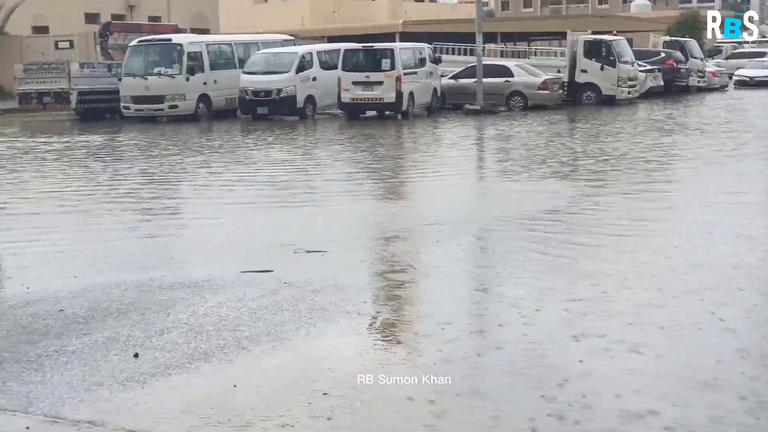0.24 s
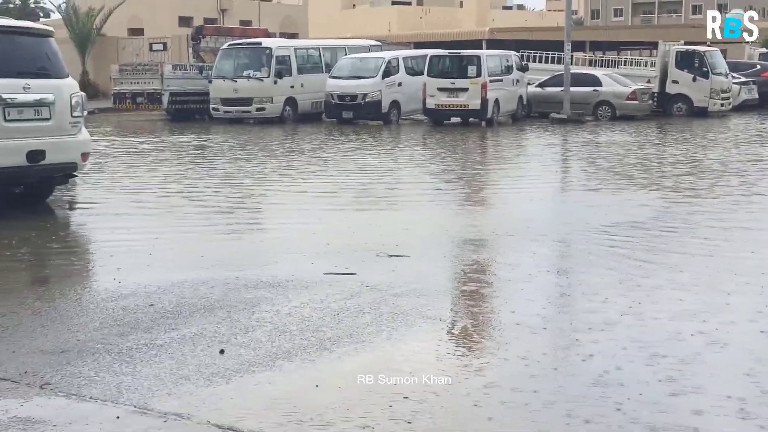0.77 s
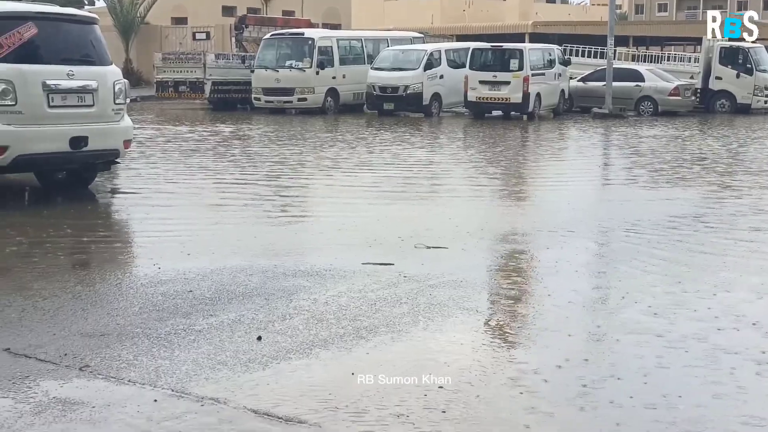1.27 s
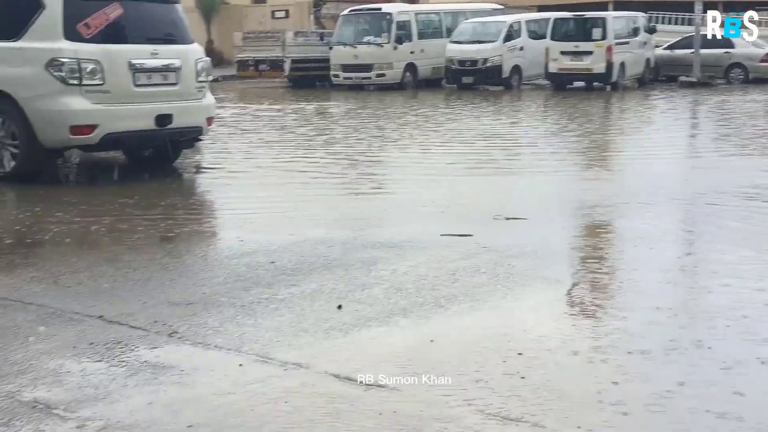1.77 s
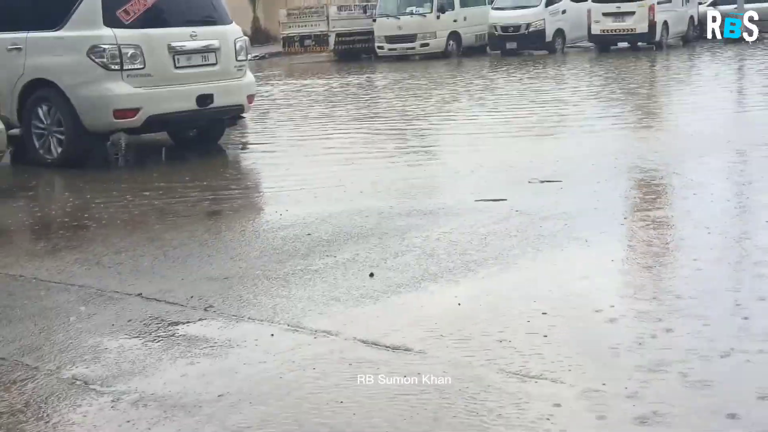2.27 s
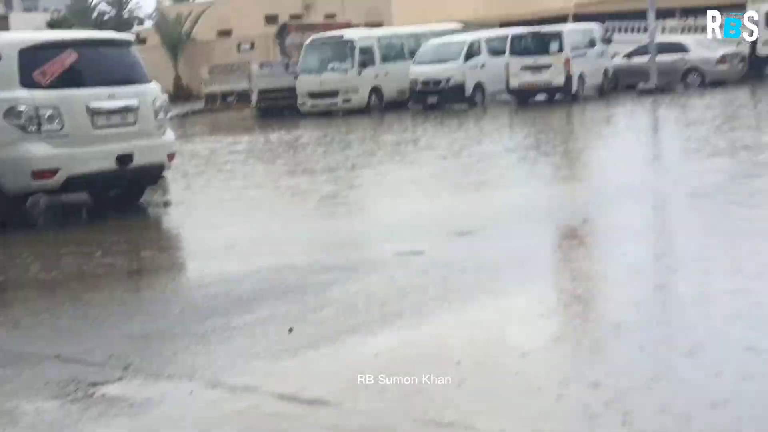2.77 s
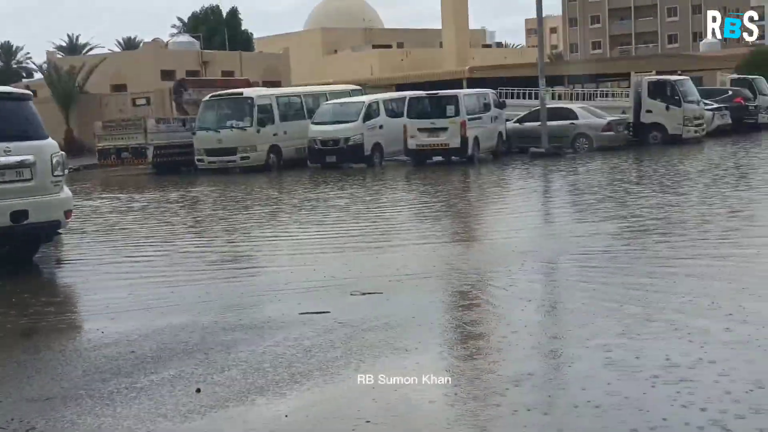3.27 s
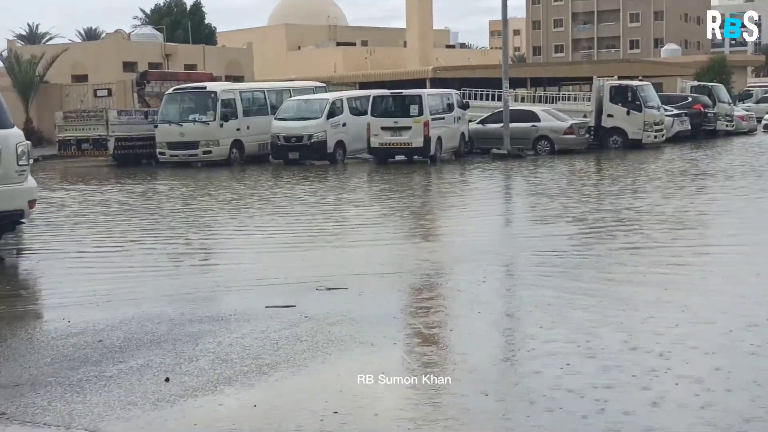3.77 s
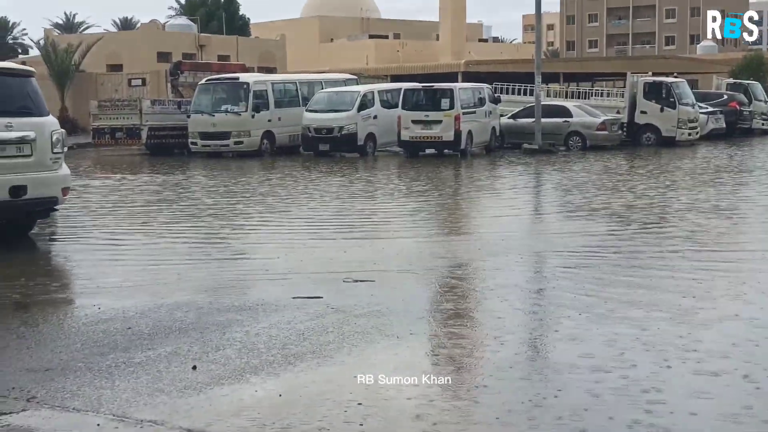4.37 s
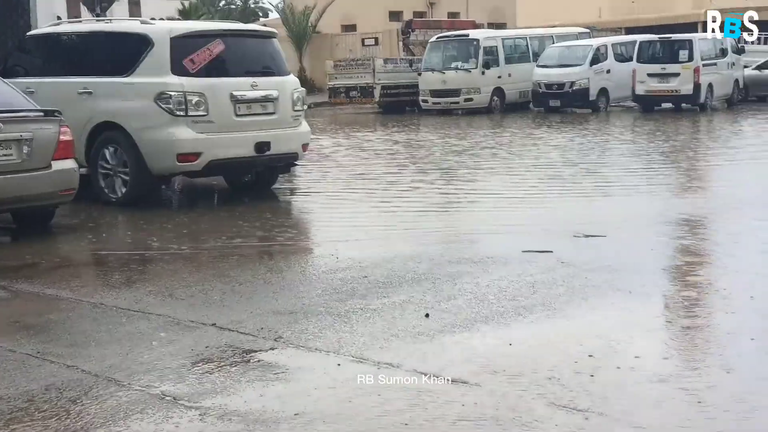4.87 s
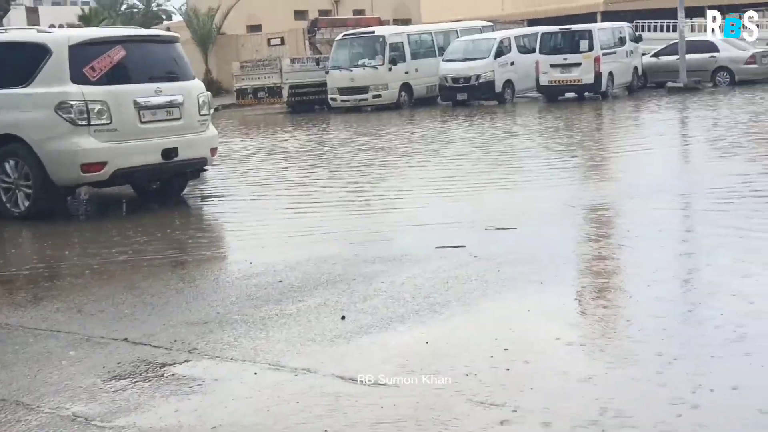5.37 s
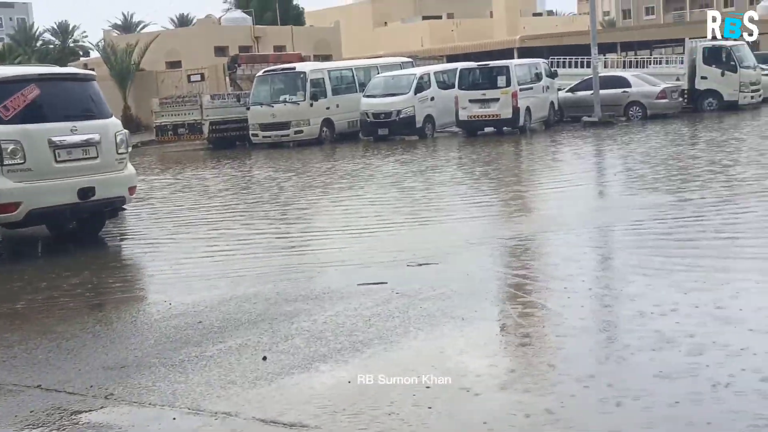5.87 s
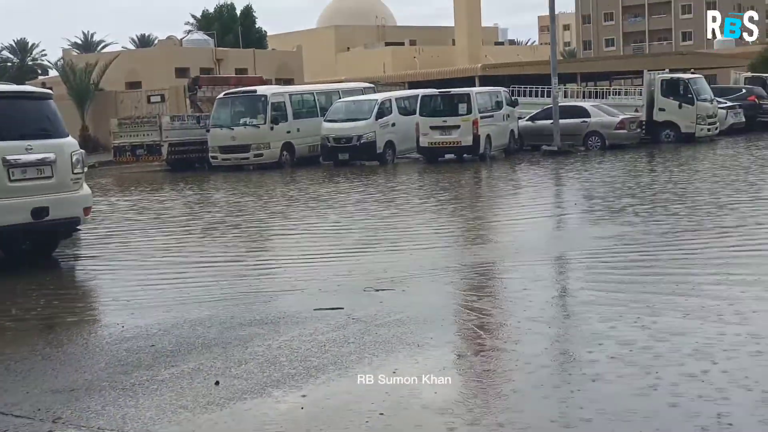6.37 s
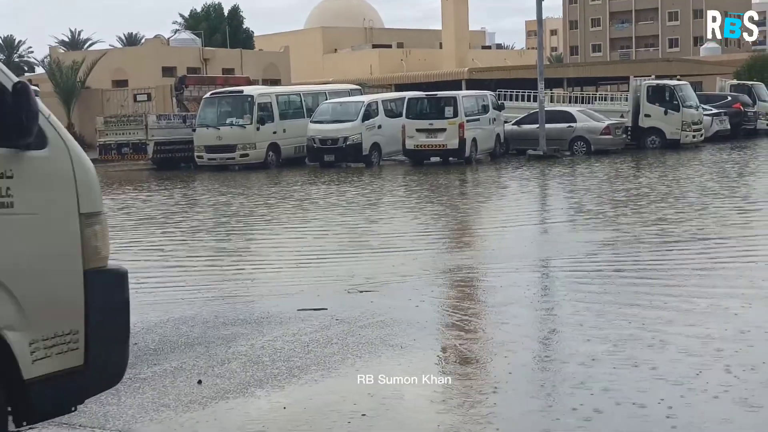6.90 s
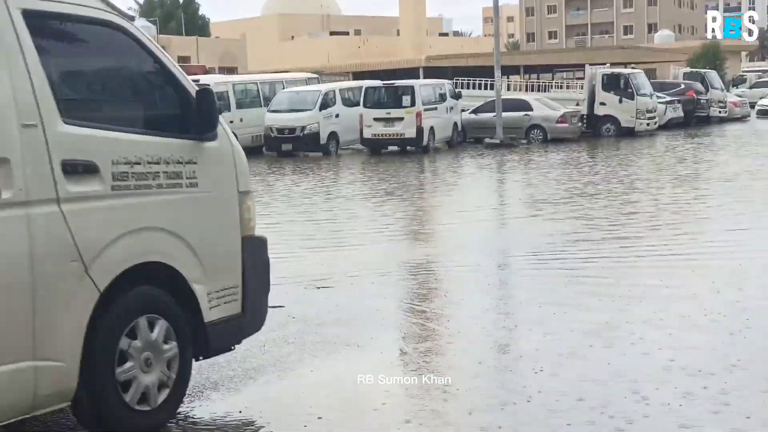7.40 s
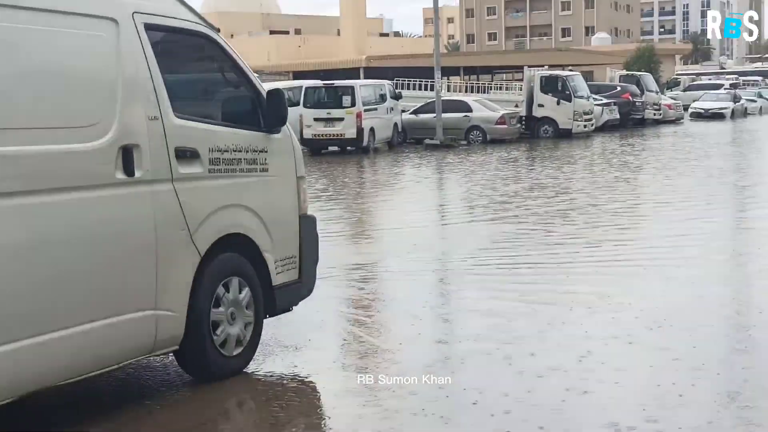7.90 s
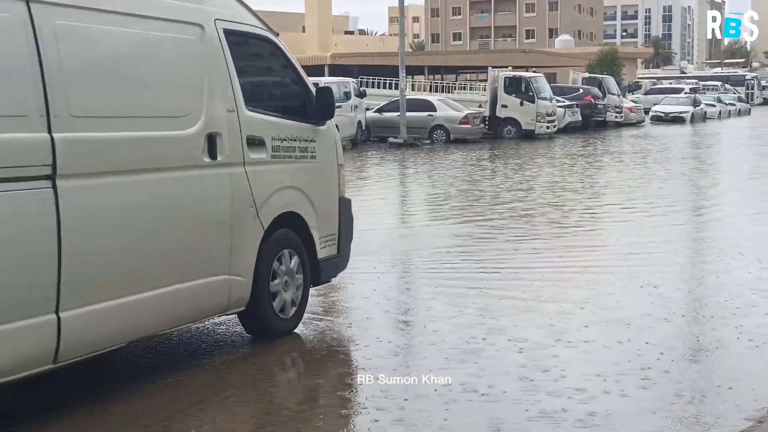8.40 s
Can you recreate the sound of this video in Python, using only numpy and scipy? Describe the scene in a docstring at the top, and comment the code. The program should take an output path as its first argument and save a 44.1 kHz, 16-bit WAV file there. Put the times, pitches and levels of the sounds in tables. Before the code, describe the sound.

A quiet outdoor background of drizzle, town hum and faint sparrows is broken by a close tap on the right of the microphone, followed by a distant caw. After a softer second tap, a van is abruptly heard driving through floodwater. Its tyres swish and churn loudly with separate splashes, the engine droning underneath, until the spray eases into a thinner hiss on the left as it comes alongside.

```python
"""Light rain hisses on a flooded street over town hum, with sparrows, a crow and two knocks on the right
microphone. Then the level jumps and a van rolls up from the side. Its tyres throw water, heard as
broadband slosh, ringing air bubbles and single splashes; its engine drones through a few body
resonances. As it draws level, the water thins to a hiss on the left."""
import sys
import numpy as np
from scipy import signal
from scipy.io import wavfile
from scipy.ndimage import uniform_filter1d

SR = 44100
rng = np.random.default_rng(int(sys.argv[2]) if len(sys.argv) > 2 else 0)


def to_wav(s):
    """Save 16-bit WAV."""
    ch = np.atleast_2d(s).T  # columns
    pcm = np.round(np.clip(ch, -1, 1) * 32767)  # PCM
    wavfile.write(sys.argv[1], SR, pcm.astype(np.int16))


N = 381454
SHORT, LONG = 256, 2048  # frame lengths in samples, for flicker and for bass
LAG_S = 0.0004286  # extra travel time to the left microphone


# Spectrum of thrown water. Each row: frequency in Hz, relative level in dB far and alongside,
# left minus right in dB far and alongside.
WATER_SPECTRUM = [(640, -33, -42, -6, 2), (1060, -3.5, -17, 5, 14), (1500, -2.5, -4.5, 3, 11),
                  (2290, 5, -24.5, 7.5, -1), (3730, -2, 11, 2, 16.5), (4720, -9.5, -18, 1, 2.5),
                  (6300, -10.5, -14.5, -2, 4), (8220, -13, -31, -4.5, -9.5), (8850, -14.5, -23, 9, 24),
                  (10050, -6, -13.5, 23, 38), (12700, -12.5, -23, 13, 24), (15500, -6.5, -27, 10, 29)]
# Slosh of the tyres. Each row: time in seconds, level in dB.
SLOSH = [(4.42, -46.5), (4.55, -47), (4.7, -45.5), (4.85, -44), (4.93, -43), (5, -40.5), (5.1, -41.5),
         (5.2, -42.5), (5.25, -36.5), (5.29, -42.5), (5.34, -38), (5.43, -37.5), (5.5, -39.5),
         (5.54, -42.5), (5.6, -31), (5.7, -37), (5.79, -36), (5.85, -33.5), (5.88, -38.5), (5.97, -33.5),
         (6.05, -37), (6.11, -38), (6.16, -42.5), (6.22, -34), (6.27, -38.5), (6.33, -35.5), (6.42, -33.5),
         (6.48, -37), (6.55, -35), (6.64, -33.5), (6.69, -46), (6.76, -40), (6.9, -35.5), (7.1, -43),
         (7.3, -38), (7.39, -42), (7.46, -38.5), (7.7, -39.5), (7.9, -45.5), (8.2, -43.5), (8.6, -48.5)]
# The van's approach. Each row: time in seconds, nearness from 0 (far) to 1 (alongside),
# fizz in dB relative to the slosh, gear whine in dB.
APPROACH = [(4.4, 0.057, -7, -43.5), (5.0, 0, -4, -50), (5.6, 0.03, -10.5, -46), (6.7, 0.21, -5.5, -51),
            (7.3, 0.34, -7.5, -57), (7.9, 0.73, -5.5, -73)]

def tyre_spray():
    """Churning water radiates broadband noise; nearness shifts its colour and side."""
    hz, t = grid(SHORT)
    near, fizz_db, _ = follow(APPROACH, t)
    far_db, near_db, far_lean_db, near_lean_db = spectrum(WATER_SPECTRUM, hz)
    db = far_db + near * (near_db - far_db)
    db -= band_db(db, hz, 1300, 4500)
    db += above(hz, 5500) * (fizz_db - band_db(db, hz, 9000, 15000))
    db += follow(SLOSH, t)[0]
    db += 1.74 * flicker(SHORT, 4, 10) + 1.8 * flicker(SHORT, 30, 3)
    bursts = uniform_filter1d(clicks(180, 7.0), size=24) * rng.standard_normal(N)
    droplets = 4.3 * np.diff(bursts, n=2, prepend=[0, 0])  # all treble
    lean_db = far_lean_db + near * (near_lean_db - far_lean_db)
    likeness = coherence(hz) * (1 - 1.6 * near)
    return stereo_noise(SHORT, db, lean_db, likeness, LAG_S, droplets + 0.16 * bubbles())


def bubbles():
    """Bubble resonance: trapped air pings, rising in pitch; smaller bubbles ring higher and shorter."""
    turns = np.linspace(0, 14, SHORT)
    shape = np.sin(2 * np.pi * turns * (1 + 0.0077 * turns)) * np.hanning(SHORT)
    pings = (np.interp(np.arange(0, 14, hz / SR), turns, shape) for hz in np.geomspace(900, 4500, 16))
    return unit_rms(sum(signal.oaconvolve(clicks(14, 2.9), ping)[:N] for ping in pings))


# Slaps of water. Each row: start in seconds, level in dB, centre frequency in Hz.
SPLASHES = [(4.9774, -32.5, 2230), (5.2412, -34.5, 2520), (5.3265, -35, 2130), (5.4061, -25.5, 2050),
            (5.5497, -35, 1980), (5.5907, -30, 2000), (5.8087, -25, 2570), (5.9585, -22.5, 3100),
            (6.1005, -30, 2330), (7.452, -30, 2980)]

def splashes():
    """An impact on water excites a broad band of noise: a fast decay, then a softer tail."""
    out, t = np.zeros((2, N)), np.arange(LONG * 2) / SR
    decay = gain_of(-3000 * t) + 0.23 * gain_of(-400 * t)
    for start, db, hz in SPLASHES:
        burst = resonate(rng.standard_normal(len(t)), hz, 1350) * gain_of(db) * decay
        add(out, start + LAG_S, burst * [[1], [0]])
        add(out, start, burst * [[0], [.7]])
    return out


# The van's bass spectrum. Each row: frequency in Hz, relative level in dB, left minus right in dB.
RUMBLE = [(30.2, -8.5, 0), (58.4, 12, 1.5), (100.6, 22, -0.5), (154.4, 4, -2.5), (237, -16.5, -11),
          (396, -14.5, -3.5), (567, -39, -16), (700, -15, 0.5)]
# The drone. Each row: time in seconds, then levels in dB of rumble, bow wave and three body resonances.
ENGINE_LEVELS = [(4.45, -53.5, -76, -77, -73, -66), (4.65, -49, -63.5, -72, -70, -61),
                 (4.85, -54, -69, -72, -75, -64), (5.05, -47.5, -73, -79, -55, -55.5),
                 (5.3, -51, -71, -75, -62, -56.5), (5.5, -51, -75, -76, -57, -57),
                 (5.7, -55, -70.5, -80, -48.5, -52), (5.95, -49, -69, -75, -50, -57.5),
                 (6.15, -59.5, -66, -77, -49.5, -52), (6.4, -50, -60.5, -69, -52, -57),
                 (6.6, -50.5, -67.5, -72, -47.5, -50.5), (6.85, -44.5, -53.5, -50, -51.5, -48.5),
                 (7.0, -46.5, -61, -71, -54, -49.5), (7.2, -44, -68, -59, -45, -60),
                 (7.45, -54, -78.5, -67.5, -49, -55), (7.65, -48, -71, -58, -49.5, -57.5),
                 (7.8, -43.5, -66, -46.5, -51, -59), (8.1, -48.5, -66, -46, -64, -63),
                 (8.4, -60.5, -70, -45.5, -55, -52), (8.58, -53.5, -68, -56, -69, -60)]
# Three body resonances, two whine lines. Each row: frequency in Hz, width in Hz, left minus right in dB.
RESONANCES = [(315.6, 25, 3.), (835, 116, 0), (1181, 56, -4.5), (2190, 37, 9.5), (1590, 90, 2.)]

def engine():
    """Incoherent sources add in power: rumble, the bow wave's gurgle, body resonances and gear whine."""
    hz, t = grid(LONG)
    rumble_db, wave_db, *body_db = follow(ENGINE_LEVELS, t)
    whine_db = follow(APPROACH, t)[-1]
    db, lean_db = spectrum(RUMBLE, hz)
    wave_share = above(hz, 169)
    rumble_gain_db = (1 - wave_share) * (rumble_db - band_db(db, hz, 50, 140))
    wave_gain_db = wave_share * (wave_db - band_db(db, hz, 360, 500))
    db = db + rumble_gain_db + wave_gain_db + 4.1 * flicker(LONG, 5, 4)
    power = gain_of(db) ** 2 * (1 - above(hz, 533))
    lean_sum = power * lean_db
    for (centre, width, side_db), level_db in zip(RESONANCES, body_db + [whine_db, whine_db - 3]):
        shape = 1 / (1 + (2 * (hz - centre) / width) ** 2) ** 2
        ring = shape / shape.mean() * gain_of(level_db + 2.5 * flicker(LONG, 2, 4)) ** 2
        power += ring
        lean_sum += ring * side_db
    drone = stereo_noise(LONG, 10 * np.log10(power), lean_sum / power, coherence(hz), 0.64 * LAG_S)
    slosh_db = follow(SLOSH, np.arange(N) / SR)[0]
    lull_db = np.minimum(slosh_db - uniform_filter1d(slosh_db, size=SR // 2), 0)
    return gain_of(1.06 * lull_db) * drone  # dips when the slosh lulls


# Taps by the right microphone. Each row: start in seconds, level in dB.
KNOCKS = [(1.865, -29.5), (4.063, -47.5)]
# Modes of its casing. Each row: frequency in Hz, relative level in dB, time to fall 60 dB in seconds.
CASING_MODES = [(130, -18, 0.13), (450, -17, 0.11), (1495, -22, 0.057)]

def knocks():
    """Impulse response of a casing: a pull and a push, then damped modes and a faint rattle."""
    out, t = np.zeros((2, N)), np.arange(LONG * 2) / SR
    u = (t - .0022) / .0005  # time in pulse widths
    pulse = 2.46 * u * np.exp(-u ** 2 / 2)
    ring = sum(gain_of(db - 60 * t / t60) * np.sin(2 * np.pi * hz * t) for hz, db, t60 in CASING_MODES)
    rattle = resonate(rng.standard_normal(len(t)), 900, 1400) * gain_of(-22 - 500 * t)
    for start, db in KNOCKS:
        add(out, start, gain_of(db) * (pulse + ring * (u > 1) + rattle) * [[.05], [1.8]])
    return out


# Sparrows and one whistler. Each row: start and length in seconds, first and last pitch in Hz, level in dB.
CHIRPS = [(0.301, .22, 2100, 2280, -64), (0.761, 0.93, 1645, 1653, -69.5), (.88, 0.1, 2070, 2000, -67),
          (1.566, .06, 2900, 2770, -63), (2.793, 0.23, 2732, 2860, -61.5), (3.302, 0.21, 3800, 3800, -67.5),
          (3.356, .1, 4760, 4270, -55.5), (3.384, 0.11, 3620, 3270, -58), (3.461, 0.075, 2824, 2694, -55.5),
          (4.011, 0.09, 3000, 2820, -54), (4.073, 0.11, 2950, 2720, -52)]

def chirps():
    """Gliding tones with narrowband noise for the blur of echoes; wider glides are raspier."""
    out = np.zeros((2, N))
    for start, length, first_hz, last_hz, db in CHIRPS:
        t = np.arange(0, length, 1 / SR)
        hz = np.linspace(first_hz, last_hz, len(t))
        width = 70 + 1.1 * abs(last_hz - first_hz)
        blur = [resonate(noise, hz, width) for noise in rng.standard_normal((2, SR))[:, :len(t)]]
        tone = 100 / width * np.sin(2 * np.pi * np.cumsum(hz) / SR)
        envelope = np.minimum(t / 0.0057, 1) * np.sqrt(1 - t / length)
        add(out, start, gain_of(db) * (tone + blur) * envelope)
    return out


# One caw. Each row: time in seconds, level in dB, throat resonance in Hz.
CAW = [(2.029, -53, 1420), (2.07, -49.5, 1410), (2.19, -49.5, 1510), (2.3, -50, 1300)]
# Its formants. Each row: ratio to the throat resonance, width in Hz, relative level in dB.
FORMANTS = [(1., 121, 0.), (1.329, 120, -4.5)]

def crow():
    """Source and filter: noise pulsed at 72 Hz excites two moving formants."""
    out, t = np.zeros((2, N)), np.arange(CAW[0][0], CAW[-1][0], 1 / SR)
    db, hz = follow(CAW, t)
    pulses = (.3 + np.exp(-(t * 72 % 1) / .3)) * rng.standard_normal(len(t))
    caw = sum(gain_of(db + trim) * resonate(pulses, ratio * hz, width) for ratio, width, trim in FORMANTS)
    add(out, t[0], caw * signal.windows.tukey(len(t), .3) * [[-.6], [1]])
    return out


# Rain and town hum. Each row: frequency in Hz, relative level in dB, left minus right in dB.
STREET_SPECTRUM = [(30, -32, 2), (60.6, 1, 7.5), (104, 1, 0), (203, -7, -1), (990, -14, 0.5),
                   (1760, -11, 3.5), (3600, -15, 1), (5620, -28, 10), (6350, -15.5, -4), (7950, -20.5, -10),
                   (9900, -10, 48), (15400, -24.5, 13)]

def rain_and_hum(level_db=-59.5):
    """Superposition: many tiny drops merge into hiss, over the town's uneven bass hum."""
    hz, _ = grid(LONG)
    db, lean_db = spectrum(STREET_SPECTRUM, hz)
    bass = 1 - above(hz, 160)
    db = db + (3.3 + 3.6 * bass) * flicker(LONG, 8, 4)
    drops = 2.2 * np.diff(clicks(150, 3.5), prepend=0)
    likeness = 0.45 * coherence(hz) + 0.77 * bass
    return gain_of(level_db) * unit_rms(stereo_noise(LONG, db, lean_db, likeness, LAG_S, drops))


# A far source at two microphones. Each row: frequency in Hz, left-right likeness from 0 to 1.
COHERENCE = [(60, 0.92), (400, 1), (1000, 0.85), (3000, 0.78), (6000, 0.1), (15000, 0.088)]

def coherence(hz):
    """Spatial coherence: two microphones agree in the bass and hardly at all in the treble."""
    return spectrum(COHERENCE, hz)[0]


def stereo_noise(size, db, lean_db, likeness, lag_s, extra=0):
    """Time and level differences give direction: the left is lag_s later and lean_db louder."""
    hz, t = grid(size)
    drive = np.pad(rng.standard_normal((2, N)) + extra, ((0, 0), (0, size)))
    shared, other = signal.stft(drive, nperseg=size, window="cosine")[2][..., :len(t)]
    likeness = np.clip(likeness, 0, 1)
    left = shared * np.exp(-2j * np.pi * hz * lag_s)
    right = (likeness * shared + np.sqrt(1 - likeness ** 2) * other) / gain_of(lean_db)
    return signal.istft([left, right] * gain_of(db), nperseg=size, window="cosine")[1][:, :N]


def resonate(x, hz, width):
    """Heterodyne band-pass: shift hz down to zero, smooth twice, shift back."""
    carrier = np.exp(2j * np.pi * np.cumsum(hz * np.ones(len(x))) / SR)
    pole = np.exp(-np.pi * width / SR)
    return unit_rms((carrier * signal.lfilter([1], np.poly([pole, pole]), x / carrier)).real)


def clicks(per_s, spread_db):
    """Shot noise: sparse random clicks, a few much larger than the rest."""
    return gain_of(spread_db * np.minimum(rng.exponential(1, N), 3.5)) * (rng.random(N) < per_s / SR)


def flicker(size, bins, frames):
    """Random modulation, smoothed over frequency and time."""
    hz, t = grid(size)
    noise = rng.standard_normal((len(t), len(hz)))
    return unit_rms(uniform_filter1d(uniform_filter1d(noise, bins), frames, 0).T)


def grid(size):
    """Bin frequencies and frame times of a short-time spectrum."""
    return np.fft.rfftfreq(size, 1 / SR)[:, None], np.arange(2 * N // size + 2) * size / 2 / SR


def spectrum(rows, hz):
    """Each column interpolated over log frequency."""
    freqs, *columns = np.transpose(rows)
    return [np.interp(np.log1p(hz), np.log1p(freqs), c) for c in columns]


def follow(rows, t):
    """Each column interpolated over time."""
    times, *columns = np.transpose(rows)
    return [np.interp(t, times, c) for c in columns]


def band_db(db, hz, lo, hi):
    """Power inside a band, relative to white noise."""
    return 10 * np.log10((gain_of(db) ** 2 * (hz > lo) * (hz < hi)).mean(0))


def above(hz, edge_hz):
    return 1 / (1 + (edge_hz / (hz + 1)) ** 8)


def gain_of(db):
    return 10 ** (np.asarray(db) / 20)


def unit_rms(x):
    return x / np.sqrt(np.mean(x ** 2))


def add(mix, start, sound):
    mix[:, round(start * SR):][:, :sound.shape[1]] += sound


def scene():
    """Sound pressures add; the van sets in at once."""
    van_on = np.arange(N) / SR > 4.3955
    return rain_and_hum() + chirps() + crow() + knocks() + van_on * (tyre_spray() + engine() + splashes())


def record(dry):
    """A low-pass filter limits the band to 15.6 kHz."""
    return signal.oaconvolve(dry, signal.firwin(511, 15600, window=("kaiser", 9), fs=SR)[None], "same")


dry = scene()
out = record(dry)
to_wav(out)
```